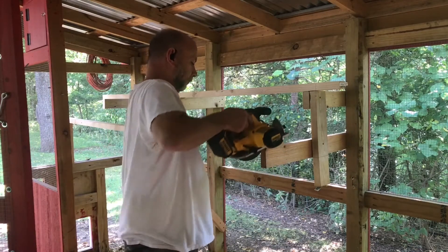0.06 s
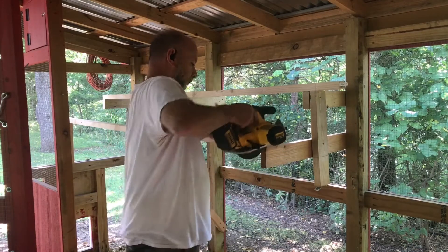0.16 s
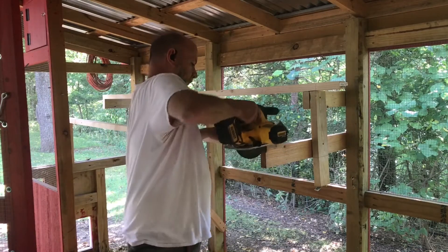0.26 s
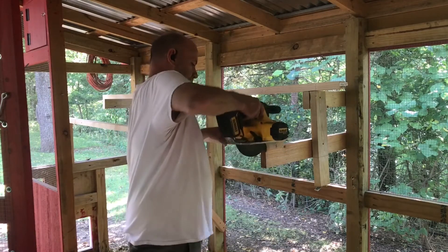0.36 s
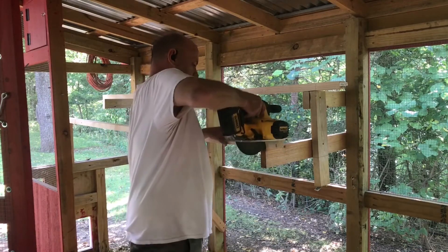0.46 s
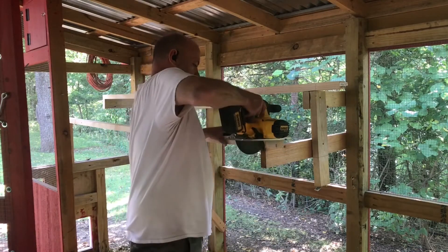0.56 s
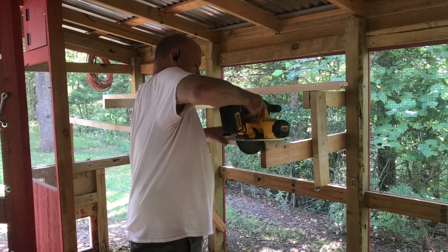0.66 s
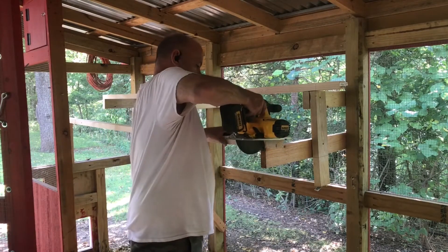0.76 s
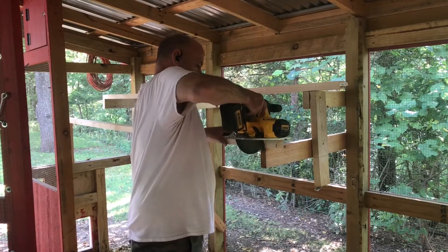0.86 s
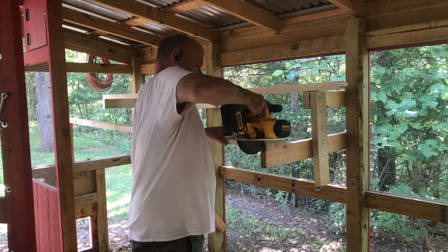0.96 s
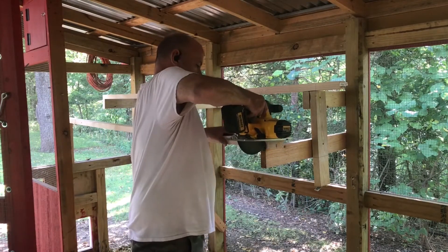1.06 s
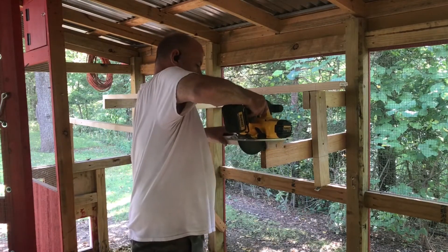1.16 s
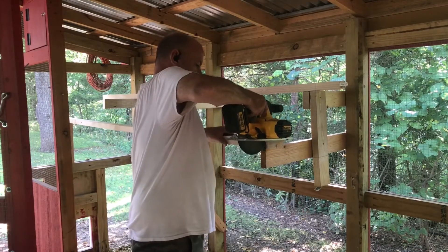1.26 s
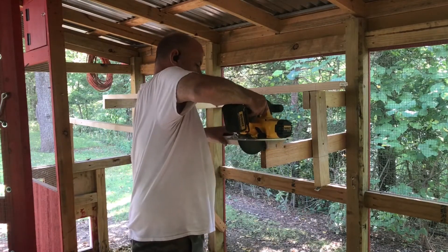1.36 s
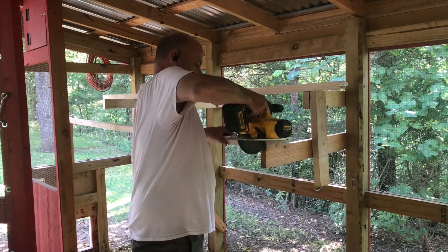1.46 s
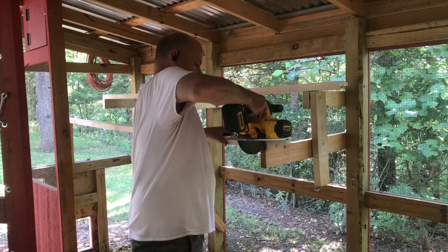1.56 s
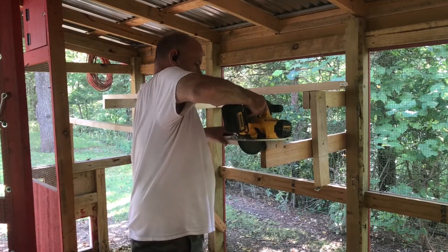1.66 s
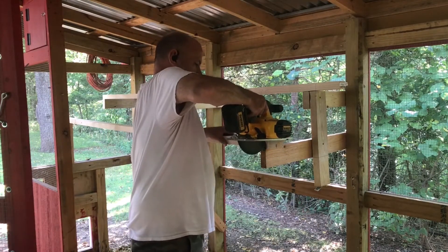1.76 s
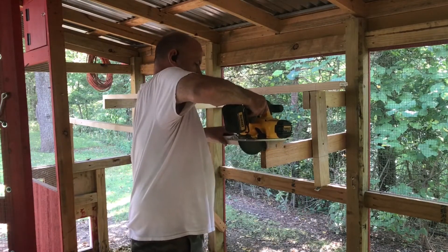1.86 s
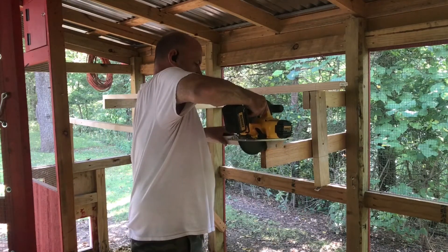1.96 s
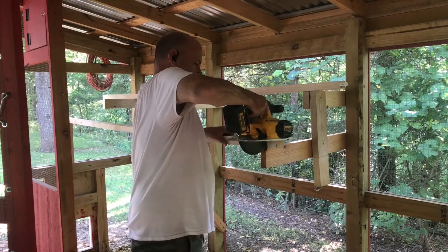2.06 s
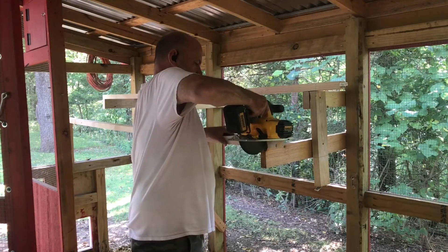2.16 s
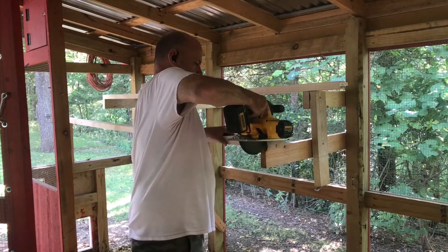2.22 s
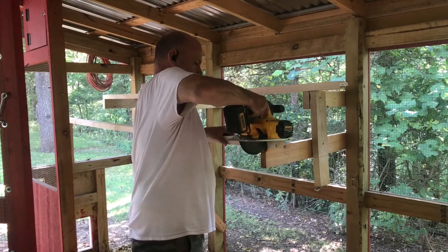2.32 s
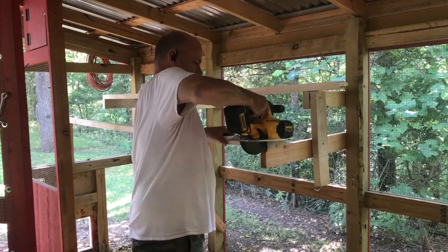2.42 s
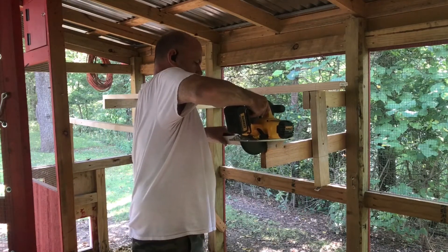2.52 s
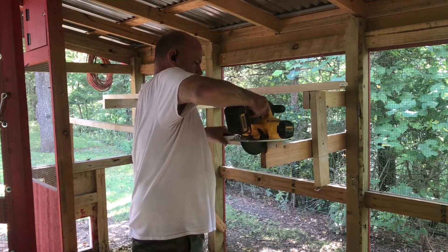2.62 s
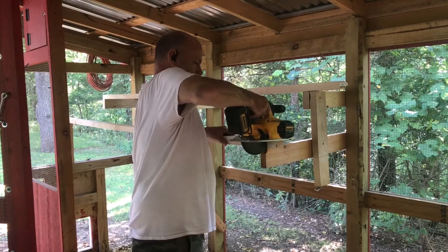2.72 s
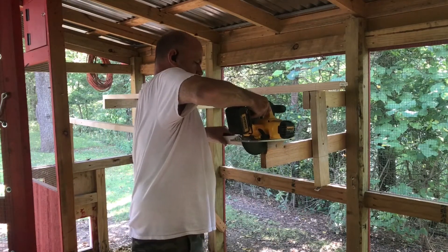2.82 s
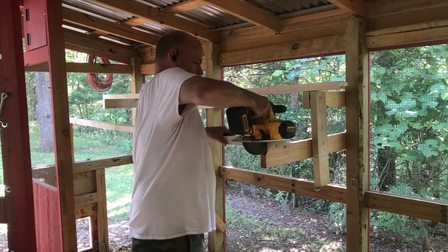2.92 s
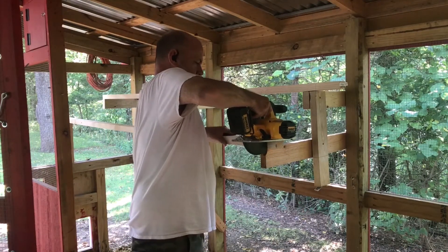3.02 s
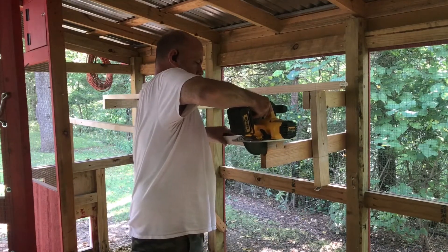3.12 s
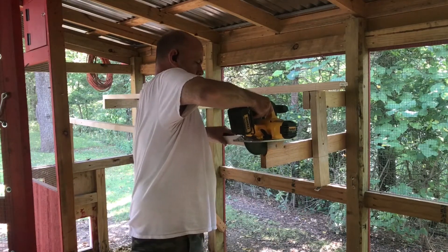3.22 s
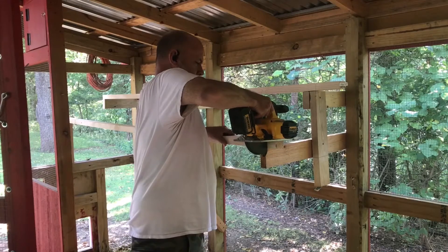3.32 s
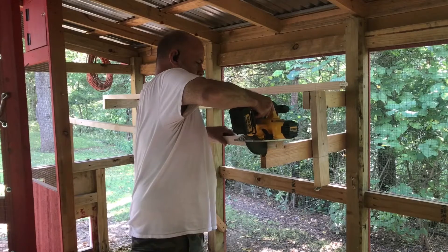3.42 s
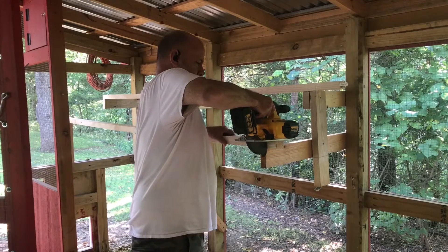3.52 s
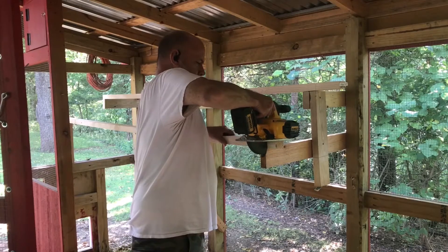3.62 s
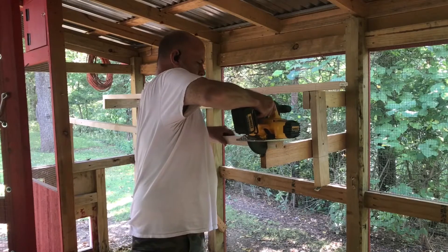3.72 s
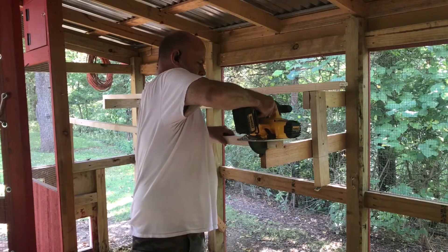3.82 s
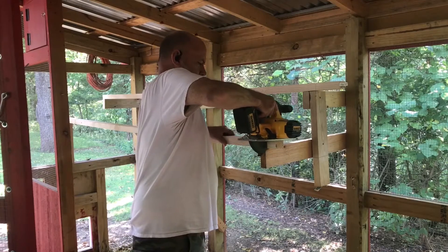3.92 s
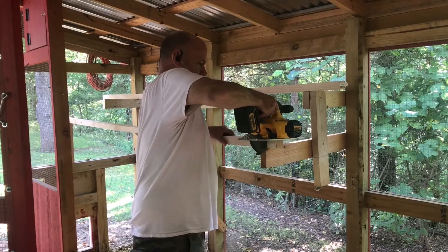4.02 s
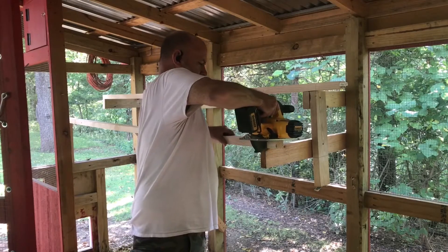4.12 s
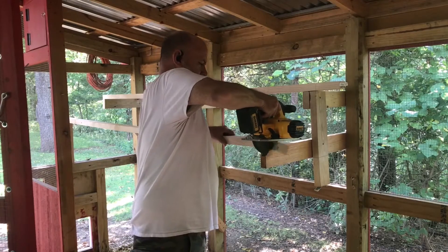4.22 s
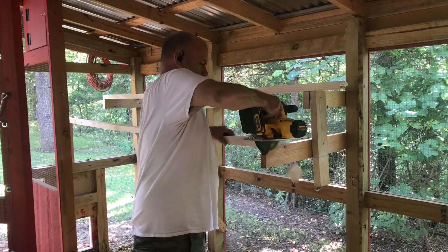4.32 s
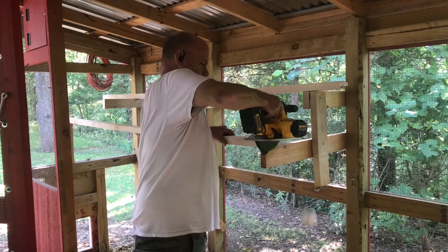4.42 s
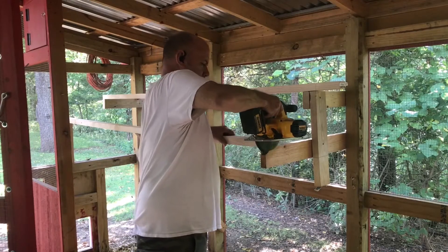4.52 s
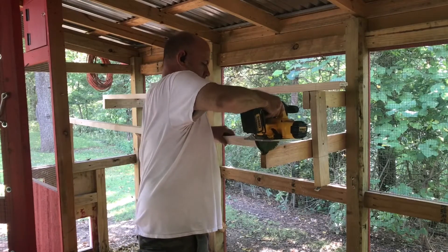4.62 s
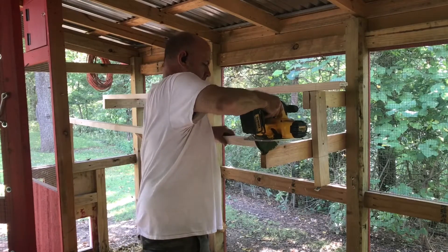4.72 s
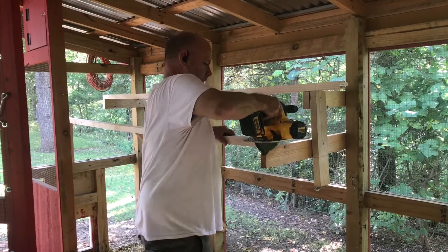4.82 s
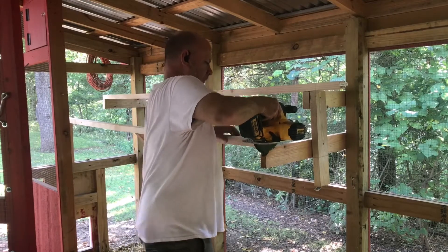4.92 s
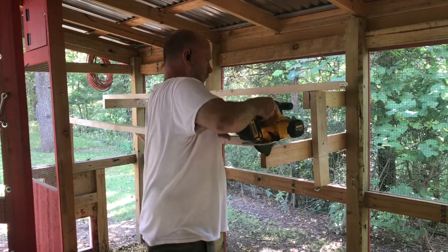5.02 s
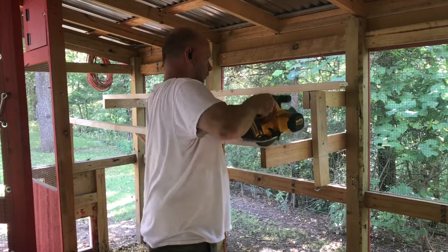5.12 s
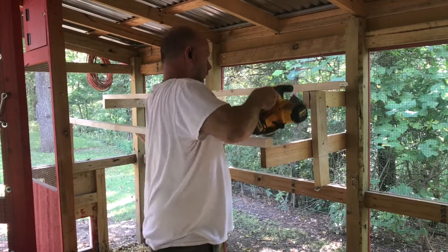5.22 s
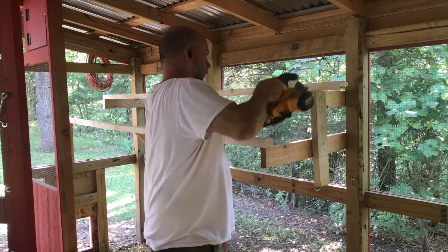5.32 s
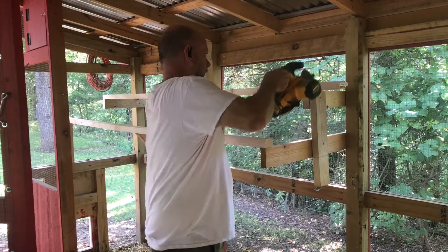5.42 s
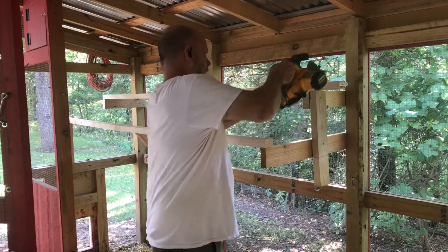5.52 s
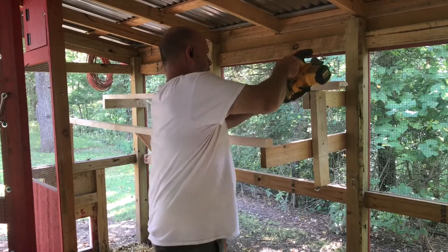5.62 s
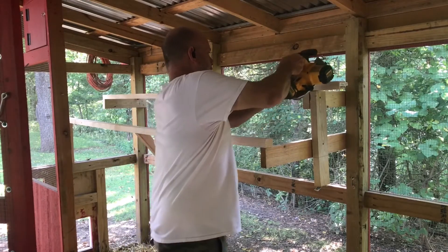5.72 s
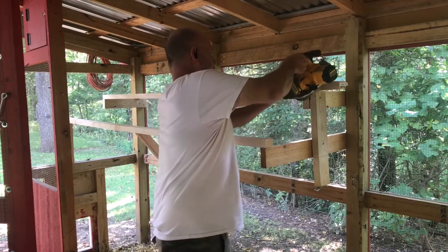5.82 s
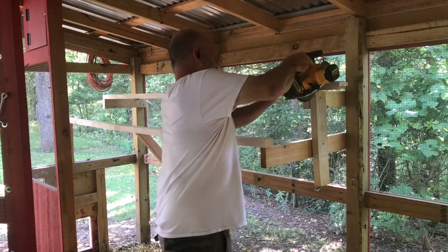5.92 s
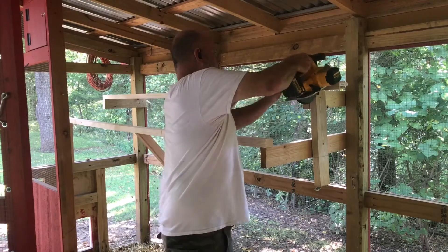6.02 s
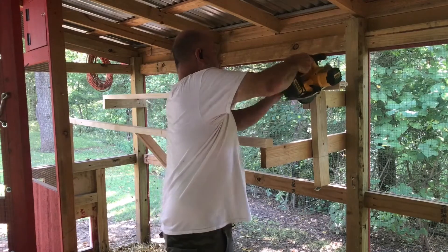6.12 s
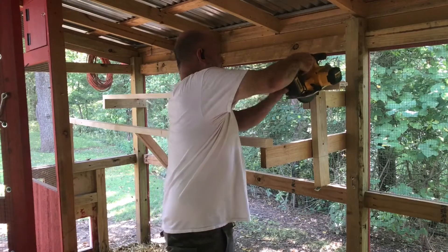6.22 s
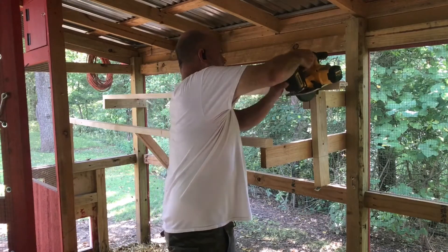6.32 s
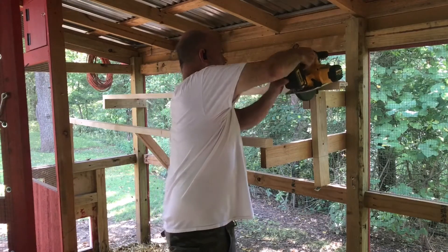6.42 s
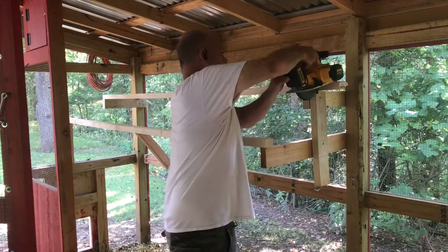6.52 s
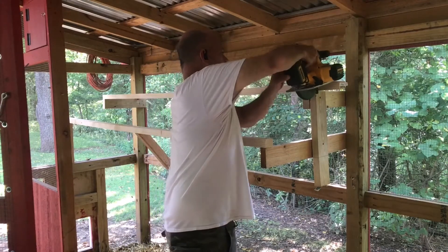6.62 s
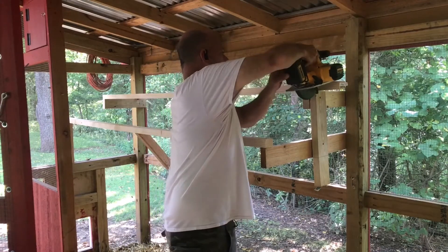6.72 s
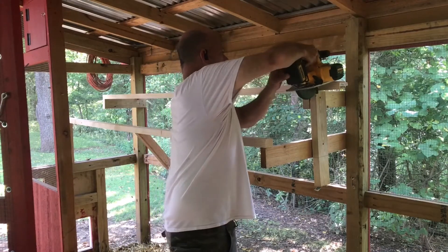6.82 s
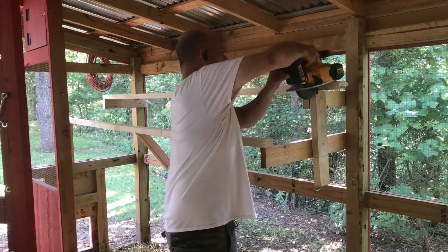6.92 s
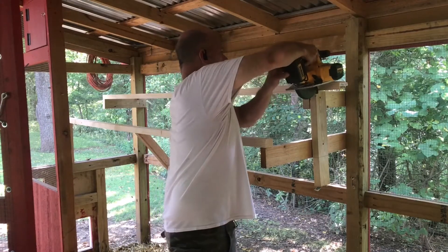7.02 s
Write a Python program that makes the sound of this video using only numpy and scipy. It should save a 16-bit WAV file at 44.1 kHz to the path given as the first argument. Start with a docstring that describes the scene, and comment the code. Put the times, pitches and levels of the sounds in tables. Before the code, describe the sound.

A cordless circular saw whines up, rasps through a board and brakes to a stop, then knocks on timber and starts again amid hissing insects.

```python
"""A cordless circular saw trims a board inside an open timber shed with a sheet roof; insects hiss in the trees.
The saw is built from gear and motor tones plus a noise roar of rattle, wind and tooth strikes, all led by speed.
The motor whines up, the blade rasps through, the offcut knocks free and the brake stops the blade.
The saw bumps the frame, is set on another board and starts again. Knocks and clacks are noise bursts with
ringing modes, the shuddering shed is low noise with booming modes, and the insects are swelling coloured noise."""
import sys
import numpy as np
from scipy import signal
from scipy.fft import rfft, irfft, next_fast_len
from scipy.io import wavfile
from scipy.ndimage import uniform_filter1d

SR = 44100
rng = np.random.default_rng(int(sys.argv[2]) if len(sys.argv) > 2 else 0)


def wrap_up_sound(samples):
    """Save the sound to the file named by the first command line argument, as 16-bit audio."""
    columns = np.atleast_2d(samples).T
    # keep every value between -1 and 1, then stretch to whole-number steps
    tamed = np.clip(columns, -1, 1)
    steps = np.round(tamed * 32767).astype(np.int16)
    wavfile.write(sys.argv[1], SR, steps)


N = 311787
T = np.arange(N) / SR
HZ = np.maximum(np.arange(N // 2 + 1) * SR / N, 1)


def from_db(db):
    """Decibels to gain."""
    return 10 ** (np.asarray(db) / 20)


def rms_one(x):
    """Scale to unit power."""
    return x / np.sqrt(np.mean(x ** 2) + 1e-20)


def in_time(rows):
    """Each column of a breakpoint curve, drawn out to every sample."""
    s, *columns = np.transpose(rows)
    return [np.interp(T, s, c) for c in columns]


def during(start, end, fade=0.042):
    """A gate, fully open from start to end, with a straight fade (s) outside each edge."""
    return np.clip((T - start) / fade + 1, 0, 1) * np.clip((end - T) / fade + 1, 0, 1)


def swell(centre, half_length):
    """A smooth bell-shaped rise and fall of height 1."""
    return np.exp(-np.minimum(((T - centre) / half_length) ** 2, 20))


def burst(start, t60, rise=0.00033):
    """Envelope of a blow: quick rise, exponential fall."""
    age = np.maximum(T - start, 0)
    return (1 - np.exp(-age / rise)) * np.exp(-np.minimum(np.log(1000) * age / t60, 20))


def drift(rate):
    """A random wander of unit spread, with a new target `rate` times per second."""
    knots = rng.standard_normal(4096)
    return rms_one(np.interp(T * rate, np.arange(len(knots)), knots))


def colour(points):
    """Gain at every frequency, falling 30 dB per octave beyond the end points."""
    hz, db = np.transpose(points)
    outside = np.maximum(np.log2(hz[0] / HZ), 0) + np.maximum(np.log2(HZ / hz[-1]), 0)
    return from_db(np.interp(np.log(HZ), np.log(hz), db) - 30 * outside)


def tilted(db_per_octave):
    """Gain of a slope pivoting on 1 kHz."""
    return from_db(db_per_octave * np.log2(HZ / 1000))


def below(hz):
    """Gain of a steep crossover's lower side."""
    return 1 / (1 + (HZ / hz) ** 8)


def shaped(x, gain):
    """Filter a sound by a gain per frequency."""
    size = next_fast_len(N + 4096)
    gain_here = np.interp(np.arange(size // 2 + 1) * SR / size, HZ, gain)
    return irfft(rfft(x, size) * gain_here, size)[:N]


def noise(gain):
    """Coloured noise of unit power."""
    return rms_one(shaped(rng.standard_normal(N), gain))


def ring(x, hz, t60):
    """One decaying mode as a two-pole resonator; a unit click rings with height about 1."""
    r, w = from_db(-60 / (t60 * SR)), 2 * np.pi * hz / SR
    return signal.lfilter([0, np.sin(w)], [1, -2 * r * np.cos(w), r * r], x + 1e-18)


def resonance(hz, width):
    """A bell of height 1 around one frequency."""
    return 1 / (1 + (2 * (HZ - hz) / width) ** 2)


# Brief dips in level. Each row: middle in seconds, length in seconds, dip in dB.
BRIEF_DIPS = [(1.194, .008, -7), (1.492, .008, -10), (1.974, .018, -30), (2.11, .007, -8), (2.433, .01, -9),
              (2.645, .007, -9), (3.381, .02, -28), (3.841, .008, -10), (3.947, .007, -7),
              (4.331, .016, -11), (5.313, .008, -10), (6.23, .012, -7), (6.357, .006, -10)]


def dips(fade=0.0087):
    """Gain of the brief dips in level."""
    return from_db(sum(db * during(s - length / 2, s + length / 2, fade) for s, length, db in BRIEF_DIPS))


# The motor's runs. Each row: switched on in seconds, brake applied in seconds.
MOTOR_RUNS = [(1.364, 4.497), (6.972, 7.5)]
RUN_UP_PER_S, RUN_UP_KNEE = 3.72, 3.6   # share of full speed gained per s; how sharply it levels off
BRAKE_S, BRAKE_CURVE = 0.24, 1.8   # time to stop; shape of the fall


def throttle():
    """Share of full speed: a steady run-up that levels off, then the brake."""
    share = 0
    for on, off in MOTOR_RUNS:
        gained = np.maximum(T - on, 0) * RUN_UP_PER_S
        run_up = gained / (1 + gained ** RUN_UP_KNEE) ** (1 / RUN_UP_KNEE)
        share = share + run_up * np.clip(1 - (T - off) / BRAKE_S, 0, 1) ** BRAKE_CURVE
    return np.maximum(share, .001)


# Colour of the insect chorus. Each row: frequency in Hz, gain in dB.
INSECT_COLOUR = [(1470, -44), (2500, -37), (3060, -10.5), (4010, -3), (5010, -5), (5980, -1), (8700, -10),
                 (9470, -20), (10100, -43), (10500, -64.5), (10800, -43), (12000, -32), (15600, -62.5),
                 (22000, -120)]
# Swells of the chorus. Each row: peak in seconds, rise in dB.
INSECT_SWELLS = [(.67, 4.5), (6.46, 5.5)]
INSECT_DB, SWELL_S = -54, 0.31   # level between swells; half length of a swell
# Colour of the soft air. Each row: frequency in Hz, gain in dB.
AIR_COLOUR = [(88, -21), (150, -6), (248, -16.5), (675, -21), (923, -23.5), (1770, -25.5), (1910, -27.5),
              (3000, -25), (3900, -53.5), (6600, -120)]
AIR_DB = -60.5
RING_HZ, RING_FROM_S, RING_DB, RING_T60_S = 1810, 5, -64, 16   # a faint lingering ring


def outdoors():
    """A swelling insect chorus and soft air, both coloured noise, with one thin decaying tone."""
    chorus_db = INSECT_DB + sum(db * swell(s, SWELL_S) for s, db in INSECT_SWELLS)
    insects = from_db(chorus_db + .5 * drift(54)) * noise(colour(INSECT_COLOUR))
    air = from_db(AIR_DB) * noise(colour(AIR_COLOUR))
    tone = np.sqrt(2) * np.sin(2 * np.pi * RING_HZ * T)
    return insects + air + from_db(RING_DB) * burst(RING_FROM_S, RING_T60_S) * tone


def shed(x, wet_db=-10.5, t60=0.18):
    """Roof and posts return a short, dull tail: decaying noise with its treble softened."""
    age = T[:SR // 2]
    tail = signal.lfilter([1], [1, -.5], rng.standard_normal(len(age)))
    tail = tail * np.exp(-np.log(1000) * age / t60) * (age > .006)
    return x + from_db(wet_db) * signal.fftconvolve(x, tail / np.linalg.norm(tail))[:N]


# Jolts to frame and roof. Each row: start in seconds, relative sway in dB, relative drumming in dB.
FRAME_JOLTS = [(0.333, -35, -33), (4.349, -46, -34), (4.691, -44, -39.5), (4.881, -41, -51),
               (5.97, -37.5, -39.5), (6.091, -32.5, -34), (6.97, -48, -46.5)]
# Colour of the shaken shed. Each row: frequency in Hz, gain in dB.
SHUDDER_COLOUR = [(12, -27.5), (20, 1.5), (40, 1.5), (76, -5.5), (107, -7), (134, -15.5), (162, -7.5),
                  (193, -18), (228, -12.5), (258, -24), (400, -29.5), (520, -50.5), (880, -120)]
SWAY_RISE_S, SWAY_T60_S, DRUM_RISE_S, DRUM_T60_S = 0.077, 4.2, 0.0016, 1.54
SWAY_REST_DB, DRUM_REST_DB, DRUM_SAWING_DB = -54.5, -60, -53   # relative levels


def shudder():
    """After each jolt the frame sways on and the roof drums, as low noise; the running saw keeps the roof astir."""
    # powers add up, so each level is squared here
    sway, drum = from_db(SWAY_REST_DB) ** 2, from_db(DRUM_REST_DB) ** 2
    for s, sway_db, drum_db in FRAME_JOLTS:
        sway = sway + (from_db(sway_db) * burst(s, SWAY_T60_S, rise=SWAY_RISE_S)) ** 2
        drum = drum + (from_db(drum_db) * burst(s, DRUM_T60_S, rise=DRUM_RISE_S)) ** 2
    drum = drum + (from_db(DRUM_SAWING_DB) * throttle()) ** 2
    tone = colour(SHUDDER_COLOUR)
    swaying = np.sqrt(sway) * noise(tone * below(86))
    return swaying + 0.87 * np.sqrt(drum) * noise(tone * (1 - below(64.5)))


# Low modes of the timber frame. Each row: frequency in Hz, relative level in dB, decay t60 in seconds.
FRAME_MODES = [(85.5, -1, 0.82), (116.3, 0.5, 0.738), (154.4, -4, 0.26), (199, -5, .4), (244.7, -5.5, 0.3),
               (291, -3.5, .3)]


def frame_boom(level_db=-4.0, lag=0.0183):
    """A moment (lag, s) after each jolt the timber frame booms at its low modes."""
    at = [round((s + lag) * SR) for s, _, _ in FRAME_JOLTS]
    jolt_db = np.array(FRAME_JOLTS)[:, 2]
    out = np.zeros(N)
    for hz, db, t60 in FRAME_MODES:
        clicks = np.zeros(N)
        struck_db = jolt_db + db + level_db + rng.normal(0, 1.6, len(at))
        clicks[at] = from_db(struck_db) * rng.choice([-1, 1], len(at))
        out += ring(clicks, hz, t60)
    return shaped(out, below(450))


# Knocks on wood. Each row: start in seconds, relative level in dB, decay t60 in seconds,
# brightness in dB per octave, ring of the board in dB.
WOOD_KNOCKS = [(0.324, -39, 0.28, -5.5, 0.5), (5.201, -31, 0.077, 0.5, 9), (5.207, -25.5, 0.15, -1, 8.5),
               (5.214, -23.5, 0.11, -0.5, 6), (5.262, -39.5, 0.31, -3, 8), (5.965, -42.5, 0.22, -3.5, 6),
               (6.083, -36, 0.21, 1, -10), (6.092, -33, 0.19, 3.5, 5), (6.117, -41, 0.074, 8.5, 6.5),
               (6.193, -45, 0.2, 2.5, -2)]
# Colour of struck or scraped wood. Each row: frequency in Hz, gain in dB.
WOOD_COLOUR = [(88, -60.5), (150, -31), (382, -11), (459, -2.5), (627, -6.5), (700, -6), (1010, -7),
               (1210, -6.5), (1330, -4.5), (1720, -7.5), (1880, -10), (2430, -8.5), (2870, -12),
               (4980, -16), (12000, -43), (15600, -74), (22000, -120)]
# The board's modes. Each row: frequency in Hz, relative level in dB, decay t60 in seconds.
BOARD_MODES = [(700, -5.5, 0.19), (940, -1.5, 0.11), (1036, -4, 0.17), (1140, -8, 0.11), (1380, -7.5, 0.22),
               (1560, -3, 0.18), (1687, -1, 0.13), (2180, -8, 0.26), (2500, -7, 0.11), (3321, -19, .08)]


def knocks(modes_db=-12.0, crack_db=3.0, thud_db=-5.0, woody_db=1.0, width_hz=90):
    """Each knock is a short clatter of noise, coloured by the board's modes, which ring on after it."""
    lift = sum(resonance(hz, width_hz) for hz, _, _ in BOARD_MODES)
    tone = colour(WOOD_COLOUR) * from_db(thud_db * below(520) + woody_db * lift)
    out = np.zeros(N)
    for s, db, t60, tilt_db, _ in WOOD_KNOCKS:
        out += from_db(db + crack_db) * burst(s, t60, rise=0.0011) * noise(tone * tilted(tilt_db))
    s, strength_db, _, tilt_db, ring_db = np.transpose(WOOD_KNOCKS)
    at = np.round(s * SR).astype(int)
    for hz, db, t60 in BOARD_MODES:
        clicks = np.zeros(N)
        struck_db = strength_db + ring_db + tilt_db * np.log2(hz / 1300) + rng.normal(0, 1.5, len(s))
        clicks[at] = from_db(struck_db + db + modes_db) * rng.choice([-1, 1], len(s))
        out += ring(clicks, hz, t60)
    return out


# The saw's shoe on the wood. Each row: middle in seconds, half length in seconds, relative level in dB.
SHOE_SCRAPES = [(4.94, 0.17, -59), (5.018, 0.022, -53), (5.055, 0.016, -46), (5.095, 0.014, -44.5),
                (5.178, 0.035, -49), (5.612, 0.068, -60), (6.28, 0.036, -52), (6.418, 0.053, -58.5)]


def slide(tilt_db=1.0):
    """The saw's shoe scrapes over the wood: noise swells of uneven level."""
    strokes = sum(from_db(db) * swell(s, half_length) for s, half_length, db in SHOE_SCRAPES)
    return strokes * from_db(2 * drift(82)) * noise(colour(WOOD_COLOUR) * tilted(tilt_db))


OFFCUT_S = 4.324
# Tones of the loose end. Each row: frequency in Hz, relative level in dB.
OFFCUT_TONES = [(630, -25.5), (700, -25), (930, -20.5), (1276, -20), (1653, -18.5), (2476, -24),
                (3101, -32), (3596, -28.5), (4307, -29), (5157, -28)]


def offcut(level_db=5.0, length=0.0081):
    """The loose end chatters on the blade for a moment as jittered tones, then rings off hollow and weaker."""
    drop_s = OFFCUT_S + length
    held = during(OFFCUT_S, drop_s, fade=0.008) + .2 * burst(drop_s, 0.06)
    tones = sum(from_db(level_db + db) * np.sin(2 * np.pi * hz * T + 0.5 * drift(220))
                for hz, db in OFFCUT_TONES)
    return held * tones


# Resonances of blade, guard and board. Each row: frequency in Hz, width in Hz, relative lift in dB.
SAW_RESONANCES = [(661, 72, 8), (803, 31, 7.1), (996, 47.6, 8.2), (1354, 17, 3.9), (1673, 50, 4.5),
                  (1890, 150, 6), (2163, 91, 6.3), (2410, 180, 5.8), (2580, 130, 5.9), (2680, 85, 6.1),
                  (3180, 23, 0.88), (3040, 23, 4), (3430, 45, 5.5), (3840, 50, 3.4), (3950, 39, 8.3),
                  (4110, 36, 2.6), (4510, 80, 4.5), (5000, 20, 1.5), (5010, 81, 3.45), (5220, 93, 3.5),
                  (5570, 63, 3.5), (6350, 30, 3.2), (5940, 20, 5), (6800, 160, 4.4), (8200, 62, 7.6),
                  (8430, 62, 3.4), (7250, 36, 5), (9420, 54, 9.3), (9980, 53, 3), (9240, 66, 4.7)]


def saw_resonances(depth=0.5):
    """Gain of the narrow resonances of blade, guard and board."""
    return from_db(depth * sum(db * resonance(hz, width) for hz, width, db in SAW_RESONANCES))


# Trigger and guard clacks. Each row: start in seconds, relative level in dB, decay t60 in seconds,
# rise in seconds, brightness in dB per octave.
SAW_CLACKS = [(1.3143, -24, 0.05, 0.00072, 0), (1.368, -33, 0.04, .0003, -1),
              (4.689, -27.5, 0.14, .0004, -1.5), (4.704, -25, 0.079, 0.0028, -4.5),
              (4.777, -32, 0.1, 0.011, 3), (6.94, -24.5, 0.058, 0.0002, 0.5),
              (6.974, -26.5, 0.091, 0.0045, -7.5), (7.018, -30, 0.09, 0.006, 2.5),
              (7.036, -25.5, 0.041, 0.00036, -2.5)]
# Colour of a clack. Each row: frequency in Hz, gain in dB.
CLACK_COLOUR = [(180, -45), (300, -23.5), (519, -8), (678, -12.5), (814, -35), (961, -3), (1250, -1),
                (1930, -6), (4160, -1), (9240, -10), (10600, -28.5), (12100, -24.5), (16000, -58)]
# Modes of the housing. Each row: frequency in Hz, relative level in dB, decay t60 in seconds.
HOUSING_MODES = [(1300, -7, .06), (1550, 1, .07), (1640, -3, .06), (4150, -4, .05), (4750, -8, .07)]


def clacks(snap_db=5.0, modes_db=-5.5):
    """Trigger and blade guard snap, as noise bursts, against the saw's housing, which rings."""
    tone = colour(CLACK_COLOUR) * saw_resonances(depth=0.55)
    out = np.zeros(N)
    for s, db, t60, rise, tilt_db in SAW_CLACKS:
        out += from_db(db + snap_db) * burst(s, t60, rise) * noise(tone * tilted(tilt_db))
    at = [round(row[0] * SR) for row in SAW_CLACKS]
    strength_db = np.array(SAW_CLACKS)[:, 1]
    for hz, db, t60 in HOUSING_MODES:
        clicks = np.zeros(N)
        clicks[at] = from_db(strength_db + db + modes_db + rng.normal(0, 1.9, len(at)))
        out += ring(clicks, hz, t60)
    return out


PING_HZ, PING_DB, PING_T60_S = 3960, -33, .14


def ping():
    """Each start jolts the blade into a short ring, a single decaying tone."""
    blows = sum(burst(on, PING_T60_S, rise=0.0012) for on, _ in MOTOR_RUNS)
    return from_db(PING_DB) * np.sin(2 * np.pi * PING_HZ * T) * blows


# Three steady tones. Each row: frequency in Hz, level in dB.
BRIEF_TONES = [(597, -30), (1217, -37), (1523, -24.5)]
BRIEF_TONES_S, BRIEF_TONES_HALF_S = 1.489, 0.015   # peak and half length


def brief_tones():
    """Three steady tones swell for an instant during the run-up."""
    tones = sum(from_db(db) * np.sin(2 * np.pi * hz * T) for hz, db in BRIEF_TONES)
    return swell(BRIEF_TONES_S, BRIEF_TONES_HALF_S) * tones


# The fan's whistle comes and goes as the saw moves. Each row: time in seconds, relative level in dB.
FAN_CURVE = [(1.62, -38), (1.75, -25), (1.82, -29), (1.9, -25), (2.04, -31), (2.25, -31), (2.45, -25),
             (2.58, -25), (2.66, -36), (2.84, -36), (2.92, -21.5), (3.0, -27), (3.08, -38), (3.9, -37),
             (4.06, -27), (4.22, -24), (4.3, -33), (4.37, -29), (4.43, -40)]
FAN_BLADES = 10


def fan(motor, share):
    """The cooling fan whistles at its blade rate and wavers, following the motor's sag."""
    level = from_db(in_time(FAN_CURVE)[0] + 1.8 * drift(30) - .7) * share ** 2
    return level * np.sin(2 * np.pi * FAN_BLADES * motor + .2 * drift(70))


# Partials of the whine that stand out. Each row: start in seconds, end in seconds,
# multiple of motor speed, relative level in dB, flutter from 0 to 1.
WHINE_FLARES = [(1.41, 1.43, 18, -33, .3), (1.445, 1.48, 18, -25, .3), (1.46, 1.495, 9, -27, .2),
                (1.52, 1.535, 18, -24, .3), (1.53, 1.59, 9, -23, .4), (1.58, 1.68, 18, -26, .7),
                (1.63, 1.72, 13, -28, .4), (1.82, 1.95, 13, -30, .2), (2.45, 2.95, 13, -28, .3),
                (4.08, 4.45, 13, -33, .3), (3.55, 3.95, 18, -29, .9), (4.02, 4.36, 18, -30, 1),
                (1.92, 2.38, 20, -34, .1), (3.55, 3.8, 22, -32, .1), (1.64, 1.9, 1, -48, 0),
                (4.505, 4.555, 9, -28, .5), (4.57, 4.62, 13, -36, .6)]


def flares(motor, blade, strain):
    """Single partials stand out; the blade's turning makes them flutter, a change of speed breaks them up."""
    out = 0
    for start, end, k, db, flutter in WHINE_FLARES:
        beat = 1 + flutter * np.cos(2 * np.pi * blade + drift(25))
        jitter = (.3 + .6 * flutter) * drift(60) + .9 * strain * drift(300)
        gate = during(start, end, fade=min(.08, .25 * (end - start)))
        level = from_db(db - 1.5 + 2.6 * drift(60)) * gate
        out = out + level * beat * np.sin(2 * np.pi * k * motor + jitter)
    return out


# Gear and motor whine. Each row: multiple of motor speed, level running free in dB, change at full bite in dB.
WHINE_PARTIALS = [(1, -46, -8), (2, -45, -3), (4, -47, 11), (6, -41, -2), (7, -45, 10), (8, -46, 9),
                  (9, -45, 9), (13, -39, -3), (18, -48, 9), (20, -46, -2)]
# The gear mesh. Each row: multiple of motor speed, relative level when driven in dB, change when braking in dB.
MESH_PARTIALS = [(6, -11, 0), (8, -9, 3), (9, 0, 2), (10, -12, 3), (13, -6, -6), (16, -13, -3),
                 (18, -4, -7), (20, -12, -3), (27, -15, -4)]
# Colour of the gear case. Each row: frequency in Hz, gain in dB.
GEAR_CASE_COLOUR = [(400, -21), (850, -12), (1100, -15), (1400, -7), (1750, -16), (2050, -4), (2550, -4.5),
                    (3100, -11), (3700, -13), (4500, -5), (5350, -5), (6600, 1), (7600, -4), (10000, -23.5)]
MESH_DB, MESH_PER_SPEED = -15.0, .65   # drive of the slap at full speed and torque; power of speed it follows
FREE_SPEED = 410   # motor turns per s


def gears(motor, speed, bite, lash, braking):
    """The mesh whines and flares across resonances; as speed changes the teeth slap and the gear case rings."""
    share, lift = speed / FREE_SPEED, saw_resonances(depth=0.44)
    mesh = 0
    for k, db, brake_db in MESH_PARTIALS:
        jitter = (.95 + .3 * braking) * drift(330)
        level = from_db(db + brake_db * braking + 2.5 * drift(90))
        mesh = mesh + level * np.cos(2 * np.pi * k * motor + jitter)
    slap = shaped(from_db(MESH_DB) * share ** MESH_PER_SPEED * lash * mesh, colour(GEAR_CASE_COLOUR))
    whine = 0
    for k, db, bite_db in WHINE_PARTIALS:
        level = from_db(db + bite_db * bite + 3 * drift(16)) * np.interp(k * speed, HZ, lift)
        whine = whine + level * np.sin(2 * np.pi * k * motor + (.3 + .6 * bite) * drift(70))
    return shed(slap, wet_db=-5.5, t60=0.12) + whine * share ** 4


# Blade wobble. Each row: multiple of blade speed, relative level on entering in dB, change when fully sunk in dB.
WOBBLE_PARTIALS = [(1, -4, -1.5), (2, -10.5, 2.5), (3, -12, 5), (4, -16, -5), (5, -10.5, -5.5),
                   (6, -11.5, 6.5)]
CUT_FROM_S, CUT_TO_S = 2.11, 4.2   # the blade sinks steadily through the board
SHAKE_DB = -44.0   # midway between free and in the cut


def board_shake(blade, sunk):
    """The wobbling blade drums at multiples of its turning, 7.6 dB harder while it is in the board."""
    wobble = 0
    for k, db, sunk_db in WOBBLE_PARTIALS:
        level = from_db(db + sunk_db * sunk + 3 * drift(12))
        wobble = wobble + level * np.sin(2 * np.pi * k * blade + 0.5 * drift(30))
    in_cut = during(CUT_FROM_S, CUT_TO_S, fade=0.17)
    return np.sqrt(2) * from_db(SHAKE_DB - 7.6 * (0.5 - in_cut)) * wobble


def wavering(hz):
    """A rubbed mode: its tone wanders, swells and breaks up."""
    swelling = .6 + .5 * drift(24) + .5j * drift(24)
    return np.real(swelling * np.exp(2j * np.pi * hz * T + 1.2j * drift(30)))


# The blade's own singing tones. Each row: frequency in Hz, relative level in dB.
SINGING_TONES = [(1362, -37), (2622, -42), (2966, -44), (3036, -37), (3903, -40), (5109, -38), (5459, -39),
                 (5728, -37), (6169, -42), (6261, -42), (6605, -37), (7130, -42), (8183, -44), (8319, -43)]
# The blade plate rings at one mode or another, mostly as the cut grips it.
# Each row: start in seconds, end in seconds, frequency in Hz, level in dB.
PLATE_RINGS = [(1.48, 1.66, 7630, -28), (1.85, 2.0, 7640, -34), (1.56, 2.0, 6570, -31),
               (2.2, 2.48, 2966, -24), (2.2, 2.5, 5450, -28), (2.25, 2.5, 5710, -30),
               (2.66, 2.74, 5735, -21), (2.65, 2.98, 5108, -25), (2.63, 2.72, 6300, -26),
               (3.06, 3.92, 3048, -25), (3.08, 3.3, 6845, -26), (3.07, 3.2, 6170, -27),
               (3.08, 3.28, 8182, -30), (3.1, 3.45, 1365, -32), (3.1, 3.55, 3420, -31),
               (3.45, 3.7, 5125, -29), (3.55, 3.85, 6604, -29), (3.88, 3.98, 1380, -27),
               (3.95, 4.15, 1675, -30), (3.96, 4.08, 2712, -29), (3.95, 4.4, 1230, -35),
               (4.53, 4.56, 5700, -29)]
SQUEAL_S, SQUEAL_RISE_S, SQUEAL_T60_S, SQUEAL_DB = 2.58, 0.18, 0.78, -3.5


def blade_tones(sing_db=-3.5, squeal_hz=5750):
    """The steel blade sings at its own modes and squeals, as resonant noise, where it enters the wood."""
    singing = 0
    for hz, db in SINGING_TONES:
        wander = drift(26) + 1j * drift(26)
        singing = singing + from_db(db) * np.real(wander * np.exp(2j * np.pi * hz * T))
    plate = sum(from_db(db) * during(start, end, fade=0.102) * wavering(hz)
                for start, end, hz, db in PLATE_RINGS)
    squeal = noise(saw_resonances(depth=2.7) / (1 + ((HZ - squeal_hz) / 650) ** 2))
    squeal *= burst(SQUEAL_S, SQUEAL_T60_S, rise=SQUEAL_RISE_S) * from_db(SQUEAL_DB + 2 * drift(70))
    return from_db(sing_db) * singing + plate + squeal


def each_turn(turns, count=200):
    """The same rough pattern of contacts, `count` equal harmonics, comes round on every turn."""
    pattern = irfft(np.r_[0, np.exp(2j * np.pi * rng.random(count))], 4096)
    return rms_one(np.interp(turns % 1, np.linspace(0, 1, len(pattern)), pattern))


RESONANCE_SHARE, RESONANCE_SWING, RESONANCE_PER_S = .8, .6, 11   # mean share, swing, changes per s


def shifting_resonances(drive, count=6):
    """The saw's resonances wax and wane at random in groups, as the grip on the blade shifts."""
    out = drive
    for k in range(count):
        lift = from_db(sum(db * resonance(hz, width) for hz, width, db in SAW_RESONANCES[k::count]))
        amount = np.maximum(RESONANCE_SHARE + RESONANCE_SWING * drift(RESONANCE_PER_S), 0)
        out = out + amount * shaped(drive, lift - 1)
    return out


# Colour of the saw. Each row: frequency in Hz, gain in dB.
SAW_COLOUR = [(180, -66), (300, -12.5), (391, -14.5), (517, -12.5), (756, -7.5), (808, -7), (1050, -5),
              (1370, -1.5), (2830, -4), (3070, 0), (4280, -2), (6790, 4), (9140, -4), (10600, -17.5),
              (15500, -33)]
TEETH = 24


def roar(blade, bite, levels_db, rattle_db=-4.5, wind_db=1.5, teeth_db=-2.5,
         chip_db=2.0, fizz_db=11.0, boom_db=2.5):
    """Rattle on every turn, blade wind and tooth strikes, split into body, rasp and hiss that follow the effort."""
    tooth = blade * TEETH
    # every tooth tears out a chip of its own size
    chip_size = from_db(chip_db * rng.standard_normal(N))[tooth.astype(int)]
    chips = chip_size * np.exp(-3 * (tooth % 1))
    teeth = rms_one(chips * (rng.standard_normal(N) + 0.67 * each_turn(blade)))
    rattle = from_db(rattle_db) * each_turn(blade)
    wind = from_db(wind_db) * rng.standard_normal(N)
    drive = rattle + wind + from_db(teeth_db) * bite * teeth
    drive = shifting_resonances(shed(drive, wet_db=-9.5, t60=0.074))
    tone = colour(SAW_COLOUR) * from_db(fizz_db * (1 - below(9300)) + boom_db * below(670))
    bands = [below(2010), below(5530) - below(1935), 1 - below(5130)]
    out = 0
    for band, db in zip(bands, levels_db):
        part = shaped(drive, tone * band)
        # even out the band, so that the effort alone sets its level
        running_level = np.sqrt(np.abs(uniform_filter1d(part ** 2, size=2500)) + 1e-12)
        out = out + from_db(db - 2.5) * part / running_level
    return out


# Thin tones that fill the dips from the cut to the brake. Each row: frequency in Hz, relative level in dB.
DIP_TONES_IN_CUT = [(1373, -8), (2428, -3), (3025, 0), (3435, -5), (3892, -6), (5163, 0), (5609, -2),
                    (6519, -4), (7138, 0), (7537, -6), (8005, -6), (8522, -11), (8877, -5)]
# Thin tones that fill the other dips. Each row: multiple of motor speed, relative level in dB.
DIP_TONES_RUNNING_FREE = [(2.02, -10), (4.05, -12), (5, -8), (5.6, -6), (6.1, -3), (7.35, -2), (9.18, -4),
                          (10, 0), (11.45, -5), (12.95, -2), (14.95, -8), (16, -2), (17, -6), (18.7, -9),
                          (20, -9)]


def thinning(sound, motor, share):
    """At each brief dip a few thin steady tones fill the gap."""
    held = during(CUT_FROM_S, MOTOR_RUNS[0][1])
    in_cut = sum(from_db(db + drift(40)) * np.sin(2 * np.pi * hz * T + .5 * drift(70))
                 for hz, db in DIP_TONES_IN_CUT)
    running_free = sum(from_db(db + drift(40.5)) * np.sin(2 * np.pi * k * motor + .5 * drift(61))
                       for k, db in DIP_TONES_RUNNING_FREE)
    tones = held * rms_one(in_cut) + (1 - held) * share * rms_one(running_free)
    kept = dips()
    level = np.sqrt(np.abs(uniform_filter1d(sound ** 2, size=2000)))
    # the tones rise as the sound dips
    return kept * sound + np.sqrt(np.maximum(1 - kept ** 2, 0)) * level * tones


# The cut drags the motor down. Each row: time in seconds, motor speed in turns per second at full throttle.
LOADED_SPEED = [(2.0, 414), (2.25, 412), (2.45, 406.5), (2.6, 402), (2.75, 399), (2.9, 390), (3.02, 382),
                (3.2, 377), (3.45, 363), (3.6, 362), (3.8, 366), (4.05, 378), (4.2, 387), (4.33, 392),
                (4.49, 400)]
# How hard the teeth are fed into the wood. Each row: time in seconds, share from 0 to 1.
BITE_CURVE = [(2.0, 0), (2.2, 0.43), (2.43, 0.36), (2.58, 0.48), (2.7, 0.92), (2.87, 0.71), (3.08, 0.78),
              (3.22, 1), (3.4, 0.86), (3.68, 0.96), (3.85, 0.76), (4.27, 0.67), (4.37, 0.4)]
# Relative loudness, one row each for the saw's body, rasp and hiss. Each row: running free in dB,
# dB per doubling of speed, speeding up in dB, braking in dB, full bite in dB, blade fully sunk in dB,
# full bite when fully sunk in dB.
EFFORT_LOUDNESS = [(-30, 4, 8, 2.5, 6, 4.5, -7), (-20.5, 6, 6.5, 0.5, 1.5, -4.5, 9.5),
                   (-28, 8.5, 13, 3.5, 18.5, -2, -10)]
BLADE_PER_MOTOR = .195   # blade turns per motor turn
UNSTEADY_DB, UNSTEADY_PER_S = 1.07, 18   # the hand's uneven pressure
BRAKE_LASH = .3   # share of the gear slap left when braking


def saw(full_torque=1200):
    """The motor turns gears and blade; speed, torque (turns per s, per s), bite and depth set the loudness."""
    share = throttle()
    speed = share * in_time(LOADED_SPEED)[0]
    bite = np.clip(in_time(BITE_CURVE)[0], 0, 1)
    sunk = np.clip((T - CUT_FROM_S) / (CUT_TO_S - CUT_FROM_S), 0, 1) * (T < MOTOR_RUNS[1][0])
    # turns made so far, with a slight unsteadiness that grows with the bite
    motor = np.cumsum(speed * (1 + (0.00027 + 0.00081 * bite) * drift(60))) / SR
    blade = motor * BLADE_PER_MOTOR
    # the torque on the gears follows the change of speed
    speed_change = uniform_filter1d(np.gradient(speed) * SR, size=1500)
    torque = np.clip(speed_change / full_torque, -1, 1)
    driving, braking = np.maximum(torque, 0), np.maximum(-torque, 0)
    lash = driving ** 1.5 + BRAKE_LASH * braking
    hand_db = UNSTEADY_DB * drift(UNSTEADY_PER_S)
    levels_db = [
        free_db + speed_db * np.log2(speed / FREE_SPEED) + drive_db * driving + brake_db * braking
        + bite_db * bite + sunk * (sunk_db + deep_db * bite) + hand_db
        for free_db, speed_db, drive_db, brake_db, bite_db, sunk_db, deep_db in EFFORT_LOUDNESS]
    # the roar yields a little while the gears slap
    blade_sound = roar(blade, bite, levels_db) * (1 - 0.38 * lash)
    blade_sound = blade_sound + blade_tones() * share + board_shake(blade, sunk)
    out = thinning(blade_sound, motor, share)
    out = out + gears(motor, speed, bite, lash, braking) + fan(motor, share)
    out = out + flares(motor, blade, np.abs(torque)) + brief_tones()
    return out * np.minimum(share / 0.036, 1)   # nearly silent at rest


def scene():
    """Shed, handling and saw together, the same on both channels."""
    kept = dips()
    background = outdoors() * kept + shudder() * kept ** throttle() + frame_boom()
    handling = shed(knocks() + slide() + offcut() + clacks() + ping())
    mono = background + handling + saw()
    return np.array([mono, mono])


CUTOFF_HZ = 15900


def record(dry):
    """Peaks are rounded, the top is cut."""
    top = 2.0
    low_pass = signal.ellip(10, .1, 90, CUTOFF_HZ, fs=SR, output="sos")
    return signal.sosfilt(low_pass, top * np.tanh(dry / top))


dry = scene()
out = record(dry)
wrap_up_sound(out)
```